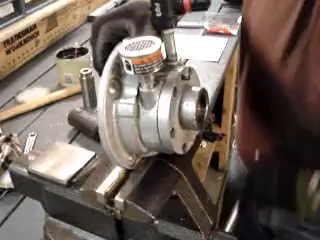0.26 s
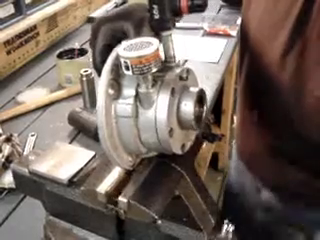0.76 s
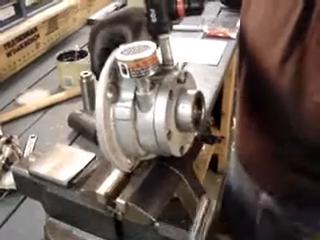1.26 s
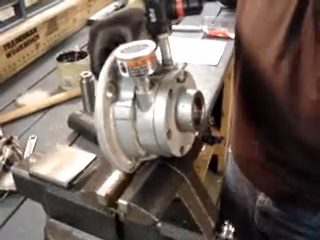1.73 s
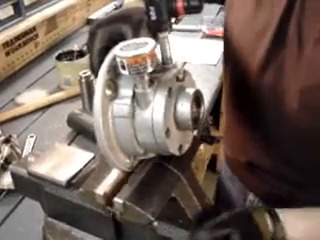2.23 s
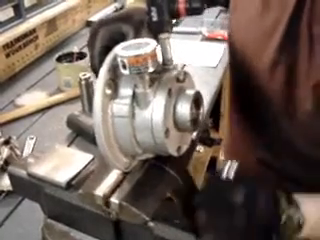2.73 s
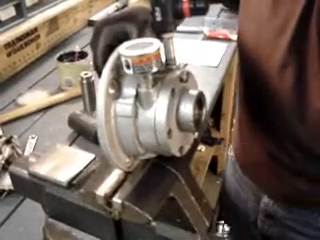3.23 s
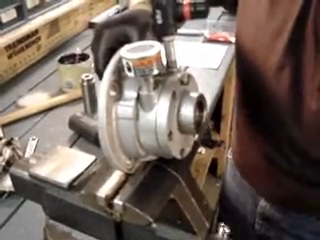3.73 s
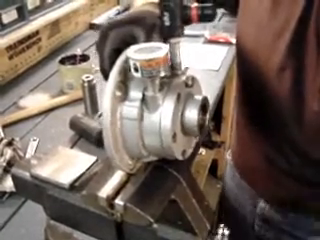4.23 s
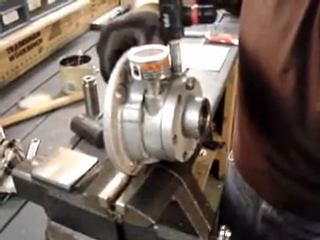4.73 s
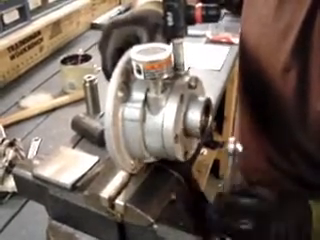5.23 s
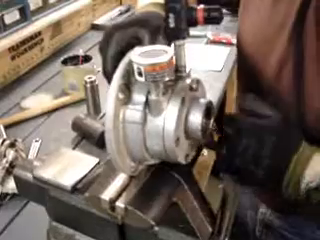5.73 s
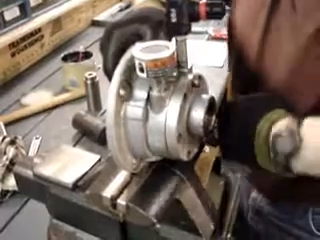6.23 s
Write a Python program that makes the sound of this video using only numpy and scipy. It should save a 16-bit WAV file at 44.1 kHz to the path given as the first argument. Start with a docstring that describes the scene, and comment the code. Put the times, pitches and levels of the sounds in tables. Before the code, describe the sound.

Close, loud metal clanks and bright tinks from a sliding vise handle give way to sparser knocks, clacks and a final faint squeak.

```python
"""A bench vise is wound shut on a metal housing, close to the microphone in a small workshop.
Its loose steel handle slides through the hub, tinkles, and hits the hub with heavy clanks.
The screw clacks and knocks in its play, grinds, and squeaks faintly as the jaws bite.
Struck steel is made of fading tones and noise; grinding and background are coloured noise.
The room adds a short tail, and the loudest blows overload the recorder."""
import sys
import numpy as np
from scipy import signal
from scipy.fft import rfft, irfft, next_fast_len
from scipy.io import wavfile

SR = 44100
rng = np.random.default_rng(int(sys.argv[2]) if len(sys.argv) > 2 else 0)


def store_wav(level_fs):
    """Save 16-bit WAV to argv[1]."""
    pcm = np.round(np.clip(np.atleast_2d(level_fs), -1, 1) * 32767)
    wavfile.write(sys.argv[1], SR, pcm.T.astype(np.int16))


N = 285238
AGE = np.arange(SR // 2) / SR  # seconds since a blow

# Event levels below are relative: each sound's function trims them further.
# The handle hits the hub: dropped on its end stop, the last one pulled by hand:
# [t/s, body level/dB, crack level/dB, bench thud level/dB, knob note f/Hz]
HANDLE_HITS = [(0.365, 3.5, -19, -28, 1380), (0.811, 3, -10, -20.5, 1463), (0.989, 0.5, -18, -23, 1296),
               (1.195, 5, -11, -29.5, 1420), (1.323, 2, -12.5, -25.5, 1490), (1.569, 6.5, -4, -23, 1357),
               (1.625, 5.5, -7, -28, 1478), (1.745, 5, -8.5, -31, 1394), (2.377, -1, -26, -16.5, 1330),
               (2.972, 0.5, -30, -28.5, 1380), (4.116, -2, -7.5, -42, 1386), (4.63, -4, -7, -34.5, 1246),
               (5.784, -17, -16, -26, 1350)]
# Hard steel-on-steel contacts at the hub: [t/s, edge level/dB, body level/dB, hub ring level/dB]
HUB_CONTACTS = [(0.2808, -8, -10.5, -25), (0.804, -2, -9.5, -9.5), (0.8949, -20, -11.5, -27),
                (1.1754, -15, -12.5, -22), (1.2674, -14, -10, -24), (1.6393, -15.5, -25, -18),
                (2.6438, -29, -11, -28.5), (2.809, -8, -13, -14), (2.8954, -12, -8.5, -9.5),
                (2.9496, 0.5, -8, -8.5), (3.0813, -20, -21, -32), (3.3823, -23.5, -30.5, -33),
                (3.494, -28, -18.5, -34), (3.5398, -21, -27.5, -42), (3.5808, -9.5, -22.5, -22),
                (3.6101, -27, -21, -35), (3.6416, -22, -17, -28), (3.7737, -30.5, -27.5, -38.5),
                (3.835, -39.5, -18, -48), (4.0075, -31.5, -47, -44), (4.114, -11.5, -11.5, -11),
                (4.1216, -11, -12, -15.5), (4.2988, -7.5, -14, -22), (4.3465, -13.5, -19, -29),
                (4.4251, -18, -21.5, -33), (4.5176, -14.5, -24.5, -25), (4.5758, -12, -28.5, -31),
                (4.6309, -5.5, -11.5, -7), (4.6371, -3.5, -18, -25), (4.769, -40, -14.5, -38),
                (4.783, -17.5, -18.5, -30.5), (4.8489, -35, -24, -32), (5.0145, -29, -33.5, -39),
                (5.7795, -15.5, -13.5, -15.5), (5.7881, -32, -19, -18)]
# Taps on the handle bar: [t/s, overtone level/dB, lowest note level/dB, t60/s]
# Here t60 is the vise body's fade; it also stretches or shortens the overtones.
BAR_TAPS = [(0.0153, -10.5, -16.5, 0.16), (0.0622, -20, -36, 0.099), (0.5224, -6.5, -20.5, 0.15),
            (0.7412, -6, -20.5, 0.14), (0.7577, -4, -26, 0.61), (0.7714, -11, -41, 0.36),
            (1.1325, -16.5, -48, 0.11), (1.4107, -14.5, -27, 0.095), (1.5368, -9, -39, 0.8),
            (1.5936, -14.5, -26, 0.2), (1.8375, -21, -35, 0.25), (1.9615, -19.5, -21, 0.33),
            (2.0684, -14.5, -50, 0.2), (2.1031, -17.5, -24.5, 0.19), (2.6945, -37, -29, 0.32),
            (2.714, -19.5, -31, 0.11), (2.7517, -7, -37, 0.11), (2.7894, -13.5, -31, 0.38),
            (2.835, -17.5, -20.5, 0.15)]
# The clearest dull knocks of the screw in its nut: [t/s, level/dB]
NUT_KNOCKS = [(0.331, -11), (0.379, -0.5), (0.973, -5.5), (1.298, -4.5), (1.384, -10.5), (1.674, -6),
              (1.914, -18), (2.051, -26), (2.245, -24), (2.341, -13.5), (2.363, -4), (2.442, -10.5),
              (2.459, -10.5), (2.547, -11.5), (2.875, -18), (3.163, -13), (3.24, -16.5), (4.083, -26),
              (4.234, -11.5), (4.275, -16.5), (4.599, -12), (4.693, -11), (4.852, -15.5), (5.566, -19.5),
              (5.604, -15), (6.44, -17)]
# The bar scrapes through the hub, for at least 5 ms: [start t/s, end t/s, rasp level/dB, singing level/dB]
BAR_SLIDES = [(0.537, 0.538, -18, -19), (0.754, 0.78, -27, -34), (1.42, 1.438, -32, -25.5),
              (1.532, 1.568, -18, -48), (2.761, 2.808, -23.5, -21.5)]
# Level between the blows: grinding, rattle and dying tails: [t/s, level/dB]
LEVEL_BETWEEN_BLOWS = [(0.0, -32.5), (0.49, -36), (0.77, -46), (0.92, -28), (1.21, -28), (1.46, -34.5),
                       (1.76, -21.5), (2.2, -43), (2.86, -27), (3.33, -40), (3.71, -34), (3.87, -41.5),
                       (4.14, -50), (4.27, -29), (4.7, -48), (5.08, -53), (5.85, -35), (6.47, -69)]
# Level of the background, as the recorder's gain drifts: [t/s, level/dB]
BACKGROUND_LEVEL = [(0, -40.5), (2.3, -48.5), (4.102, -47), (5.2, -43.5), (6.47, -42.5)]

# Clear notes of each part: [f/Hz, relative level/dB, t60/s before the stretch given to ring()]
# The sliding jaw
JAW_NOTES = [(634.6, 2, 0.28), (597, 5.5, 0.19), (677.7, -1, 0.25), (439.7, -3.5, 0.28)]
# The handle bar's overtones, same columns [f/Hz, level/dB, t60/s]
BAR_OVERTONES = [(4754, -9, 0.14), (5860, 4, 0.1), (6040, 8.5, 0.078), (6110, 7, 0.03), (6400, 0, 0.071),
                 (6650, -12.5, 0.051), (7500, -45, 0.039), (8700, -34, 0.13), (9800, -4.5, 0.19),
                 (9450, -9, 0.067), (11000, -24, 0.36)]
# The bar's lowest bending pair, same columns [f/Hz, level/dB, t60/s]
BAR_LOWEST = [(3063, -2.5, 0.13), (3010, -10.5, 0.12)]
# The hub, same columns [f/Hz, level/dB, t60/s]
HUB_NOTES = [(2987, -3, 0.13), (3350, 4, 0.085), (3527, 0, 0.062), (4110, 0, 0.085), (4696, -4, 0.097),
             (4900, -7, 0.082)]
# The collar, same columns [f/Hz, level/dB, t60/s]
COLLAR_NOTES = [(5750, 2, 0.025), (6100, 4, 0.046), (6910, 0, 0.04), (7240, -10, 0.13), (8200, -36, 0.029),
                (9350, -11, 0.065), (10900, -20.5, 0.074)]
# The vise's cast body, same columns [f/Hz, level/dB, t60/s]
CASTING_NOTES = [(650.6, -5, 0.15), (788, -12.5, 0.063), (1016, -2, 0.087), (1010, -12, 0.12),
                 (1186, 2.5, 0.084), (1251, -0.5, 0.096), (1582, -5, 0.09)]
# The screw's nut, same columns [f/Hz, level/dB, t60/s]
NUT_NOTES = [(1201, 0.5, 0.08), (1135, -3, 0.082), (1301, -5.5, 0.14), (759, -4.5, 0.18), (650.4, -1, 0.14)]
# The clamped metal housing, same columns [f/Hz, level/dB, t60/s]
HOUSING_NOTES = [(1470, 4, 0.14), (1860, -9, 0.28), (1903, -8, 0.23), (1960, -4.5, 0.17), (2342, -0.5, 0.1),
                 (2482, -3.5, 0.094), (2534, 7, 0.045)]

# Noise colours, scaled to a common loudness when used: [f/Hz, relative level/dB per Hz]
# The many close notes of the iron under a clank
IRON_COLOUR = [(100, -51), (300, -32), (520, -10.5), (640, -2.5), (820, -1), (1000, 3.5), (1450, -3.5),
               (1700, -6), (1920, -4.5), (2130, -18.5), (2400, -13), (3300, -16), (5000, -37), (12000, -28)]
# The vise body's hollow answer, same columns [f/Hz, level/dB]
BODY_COLOUR = [(100, -51), (300, -8), (520, -3.5), (660, 1.5), (850, -1), (1200, -6), (1380, -6),
               (1750, -12.5), (2600, -15), (5000, -27.5), (11000, -33), (13000, -37)]
# The sharp edge of steel on steel, same columns [f/Hz, level/dB]
EDGE_COLOUR = [(1200, -26), (2200, -10), (3200, 8), (3800, 1), (4400, 0), (5300, -0.5), (6200, 0),
               (7500, -6), (8800, -9.5), (10200, -8), (11500, -21), (13000, -22)]
# The bench's low thud, same columns [f/Hz, level/dB]
THUD_COLOUR = [(30, -46), (70, -15), (110, -14), (200, -4), (340, -1), (450, 6.5), (700, -43), (2000, -60)]
# The hub sleeve's close notes, same columns [f/Hz, level/dB]
SLEEVE_COLOUR = [(1500, -18), (2300, -16), (2950, 0.5), (3450, 1), (3800, -4.5), (4200, -21), (4800, 0),
                 (5600, -34), (8000, -19)]
# The grinding thread, same columns [f/Hz, level/dB]
THREAD_COLOUR = [(100, -16), (250, -2.5), (450, 2.5), (700, 1.5), (1300, -13), (1900, -7), (3000, -25),
                 (6000, -35), (11000, -29.5), (13000, -46)]
# The workshop background, same columns [f/Hz, level/dB]
BACKGROUND_COLOUR = [(15, -60), (25, -22), (150, -14.5), (246, -5), (383, -5), (484, -9), (524, -11),
                     (566, -13), (715, -10.5), (836, -16), (2430, -26), (3680, -30.5), (5030, -30.5),
                     (11000, -40.5), (12500, -44), (16200, -63), (22000, -120)]
# How long the room's tail takes to fade by 60 dB: [f/Hz, t60/s]
ROOM_FADE = [(120, 0.75), (400, 0.86), (1000, 0.37), (3000, 0.48), (6000, 0.38), (10000, 0.34)]

SQUEAK_START_S, SQUEAK_END_S = 5.89, 6.39  # the thread squeaks as the jaws bite
CLACK_T60_S, KNOCK_T60_S = 0.11, 0.15  # the time to fade by 60 dB
JAW_DB, JAW_LOSS_DB_PER_S = -15, 4.5  # relative to the clank; the slack jaw hums less as the vise closes
HOUSING_DB, HOUSING_LOSS_DB_PER_S = -19, 3  # relative to the clank; the jaws grip the housing more and more
TINK_BODY_DB = -10  # relative to the tap
NUT_DB, KNOCK_WASH_DB, KNOCK_THUD_DB = -18.5, -18, -28.5  # nut, body and bench, relative to the knock
GRIND_DB = -9  # relative to the level between the blows
# Small chance contacts, relative to the level between the blows, before each sound's own trims
RATTLE_KNOCK_DB, RATTLE_EDGE_DB, RATTLE_BODY_DB, RATTLE_HUB_DB = 12.5, 6, 2.5, -5
RATTLE_SCATTER_DB = 1.5
TOP_HZ = 12350  # the recorder's band limit


def amp(db):
    """Turn decibels into gain."""
    return 10 ** (np.asarray(db) / 20)


def unit(x):
    """Scale to an average (rms) strength of 1."""
    return x / np.sqrt(np.mean(x ** 2) + 1e-20)


def along(points, hz):
    """Read (f/Hz, value) points on a log pitch axis."""
    f, v = np.transpose(points)
    return np.interp(np.log(hz + 1), np.log(f + 1), v)


def wobble(rate, size):
    """Draw a random curve of straight lines between `rate` points a second."""
    knots = rng.standard_normal(int(size * rate / SR) + 3)
    return np.interp(np.arange(size) * rate / SR, np.arange(len(knots)), knots)


def noise(colour, size, ripple_db=0, spacing_hz=170):
    """Make coloured noise of rms 1, with optional chance peaks along its spectrum."""
    m = next_fast_len(size)
    hz = np.fft.rfftfreq(m, 1 / SR)
    peaks = np.interp(hz / spacing_hz, np.arange(256), rng.standard_normal(256))
    ripple = peaks * hz / (hz + 1500)  # weaker in the bass
    gain = amp(along(colour, hz) + ripple_db * ripple)
    return unit(irfft(rfft(rng.standard_normal(m)) * gain, m)[:size])


def add(track, s, sound):
    """Mix a sound into the track at time s."""
    part = track[max(round(s * SR), 0):][:len(sound)]
    part += sound[:len(part)]


def blow(x):
    """Scale a struck sound to rms 1 over its first 20 ms."""
    return x / np.sqrt(np.mean(x[:SR // 50] ** 2) + 1e-20)


def fade(t, t60, hold):
    """A contact buzzes at full strength for hold seconds, then dies away by 60 dB in t60 seconds."""
    return amp(-60 * np.maximum(t - hold, 0) / np.maximum(t60, .01))


def wash(colour, t60, rise, hold=0):
    """Countless close notes, made as noise, swell and die together; each blow favours other ones."""
    notes = noise(colour, len(AGE), ripple_db=4.5)
    swell = 1 - np.exp(-AGE / rise)
    return blow(notes * fade(AGE, t60, hold) * swell)


def ring(notes, stretch, scatter_db, detune, rise=0.0017, waver=0.5, hold=0):
    """Clear notes, struck at a new spot each time; grip sets their life and loose contact makes them waver."""
    hz, db, t60 = np.transpose(notes)[:, :, None]
    level, shift, phase = rng.standard_normal((3, len(notes), 1))
    t = AGE[:SR // 3]
    drift = np.array([wobble(128.8, len(t)) for _ in notes])
    tones = np.sin(2 * np.pi * (hz * (1 + detune * shift) * t + phase) + waver * drift)
    sound = np.sum(amp(db + scatter_db * level) * fade(t, t60 * stretch, hold) * tones, axis=0)
    swell = 1 - np.exp(-t / rise)
    return blow(np.pad(sound * swell, (0, len(AGE) - len(t))))


def background():
    """Steady background noise, heard louder or softer as the recorder's gain drifts."""
    level_db = np.interp(np.arange(N) / SR, *np.transpose(BACKGROUND_LEVEL))
    return amp(level_db) * noise(BACKGROUND_COLOUR, N)


def between_blows(s):
    """Read the level between the blows, in dB, at time s."""
    return np.interp(s, *np.transpose(LEVEL_BETWEEN_BLOWS))


def screw():
    """The turning thread grinds unevenly inside the casting: noise with a jittery level."""
    level_db = between_blows(np.arange(N) / SR) + GRIND_DB + 6.4 * wobble(45, N)
    return amp(level_db) * noise(THREAD_COLOUR, N)


def casting(t60):
    """The vise body answers any light contact with a hollow knock."""
    notes = ring(CASTING_NOTES, t60 / 0.13, scatter_db=1, detune=0.0217, rise=0.0054, waver=0.76)
    return 0.58 * notes + 0.47 * wash(BODY_COLOUR, t60, rise=0.0039)


def tinks():
    """The free bar rattles against the hub and rings in its bending notes until it is damped."""
    out = np.zeros(N)
    for s, ring_db, note_db, t60 in BAR_TAPS:
        overtones = ring(BAR_OVERTONES, t60 / 0.24, scatter_db=3.0, detune=0.003,
                         rise=0.0014, waver=0.81, hold=0.0071)
        edge = wash(EDGE_COLOUR, t60=0.098, rise=0.00024, hold=0.0033)
        tap = amp(-15.0) * overtones + amp(-16.5) * edge + amp(TINK_BODY_DB) * casting(t60)
        lowest = ring(BAR_LOWEST, t60 / .25, scatter_db=1, detune=.002, rise=.0013, waver=.25)
        add(out, s, amp(ring_db) * tap + amp(note_db - 5.5) * lowest)
    return out


def rattle(count):
    """Loose parts touch at chance moments, following the level between the blows: rows [t/s, level/dB]."""
    s = (np.arange(count) + rng.random(count)) / count * N / SR
    return np.transpose([s, between_blows(s) + RATTLE_SCATTER_DB * rng.standard_normal(count)])


def knocks():
    """Greased contacts start softly and have little edge; they shake the nut, the body and the bench."""
    out, t60 = np.zeros(N), KNOCK_T60_S
    small = [(s, db + RATTLE_KNOCK_DB) for s, db in rattle(count=55)]
    for s, db in list(NUT_KNOCKS) + small:
        nut = ring(NUT_NOTES, t60 / 0.13, scatter_db=3, detune=0.022, rise=0.0031, waver=0.99, hold=0.0025)
        body = wash(BODY_COLOUR, t60, rise=0.0013)
        bench = wash(THUD_COLOUR, t60=0.25, rise=0.0021)
        knock = amp(NUT_DB) * nut + amp(KNOCK_WASH_DB) * body + amp(KNOCK_THUD_DB) * bench
        add(out, s, amp(db) * knock)
    return out


def clacks():
    """Tight steel contacts buzz: a bright snap from the collar, a rough ring from the hub and sleeve."""
    out, t60 = np.zeros(N), CLACK_T60_S
    small = [(s, db + RATTLE_EDGE_DB, db + RATTLE_BODY_DB, db + RATTLE_HUB_DB)
             for s, db in rattle(count=36)]
    for s, edge_db, body_db, hub_db in list(HUB_CONTACTS) + small:
        collar = ring(COLLAR_NOTES, t60 / 0.52, scatter_db=9.5, detune=0.0105,
                      rise=0.0014, waver=1.0, hold=0.013)
        edge = wash(EDGE_COLOUR, t60 * 0.38, rise=0.00064, hold=0.0036)
        snap = amp(-18.5) * edge + amp(-21.0) * collar
        hub_notes = ring(HUB_NOTES, t60 / 0.13, scatter_db=5, detune=0.012, rise=0.001, waver=1.3)
        hub = 0.72 * hub_notes + 0.32 * wash(SLEEVE_COLOUR, t60 * .8, rise=0.001)
        add(out, s, amp(edge_db) * snap + amp(hub_db - 7) * hub + amp(body_db - 5) * casting(t60))
    return out


def clanks():
    """The handle hits the hub: a crack and a short loud note, which jaws, housing and bench take up."""
    out = np.zeros(N)
    for s, body_db, crack_db, thud_db, note_hz in HANDLE_HITS:
        jaw_db = body_db + JAW_DB - JAW_LOSS_DB_PER_S * s
        housing_db = body_db + HOUSING_DB - HOUSING_LOSS_DB_PER_S * s
        knob = ring([(note_hz, 0, .035)], stretch=0.78, scatter_db=.5, detune=0.00194,
                    rise=0.00051, waver=0.42, hold=0.0015)
        jaw = ring(JAW_NOTES, stretch=1, scatter_db=2, detune=.025, rise=.004, waver=1.1)
        housing = ring(HOUSING_NOTES, stretch=1, scatter_db=3, detune=0.0045, rise=0.0037, waver=1.0)
        add(out, s, amp(body_db - 14.5) * knob + amp(jaw_db) * jaw + amp(housing_db) * housing)
        add(out, s, amp(body_db - 18.5) * wash(IRON_COLOUR, t60=0.1853, rise=0.00057))
        add(out, s, amp(crack_db - 17.5) * wash(EDGE_COLOUR, t60=0.033, rise=0.0003))
        add(out, s, amp(thud_db - 5.5) * wash(THUD_COLOUR, t60=0.36, rise=0.0005))
    return out


def slides(slips_per_s=900):
    """A sliding bar chatters: a fast run of tiny slips rasps in the hub and keeps the bar singing."""
    out = np.zeros(N)
    for start, end, rasp_db, singing_db in BAR_SLIDES:
        chance, force = rng.random(len(AGE)), rng.standard_normal(len(AGE))
        size = max(round((end - start) * SR), SR // 200)
        slips = (force * (chance < slips_per_s / SR))[:size]
        rasp = wash(EDGE_COLOUR, t60=0.013, rise=0.00012)
        singing = ring(BAR_OVERTONES + BAR_LOWEST, stretch=.25, scatter_db=2, detune=.005)
        for db, steel in (rasp_db, rasp), (singing_db, singing):
            scrape = signal.fftconvolve(slips, steel)  # every slip strikes the steel anew
            # same total energy as a sound of rms 1 lasting as long as the slips
            level = np.sqrt(len(slips) / (np.sum(scrape ** 2) + 1e-9))
            add(out, start, amp(db) * scrape * level)
    return out


def squeak(slips_per_s=27, start_hz=4800, db=-53):
    """Under load the thread sticks and slips in tiny, high, rising chirps."""
    out, t = np.zeros(N), AGE[:SR // 70]
    times = np.arange(SQUEAK_START_S, SQUEAK_END_S, 1 / slips_per_s)
    for s, (late, shift, level) in zip(times, rng.standard_normal((64, 3))):
        chirp = np.sin(2 * np.pi * start_hz * (1 + .012 * shift) * (t + .8 * t * t))
        add(out, s + .003 * late, amp(db + 2 * level) * np.hanning(len(t)) * chirp)
    return out


def workshop(x):
    """The room's tail is fading noise, 8 ms late; its treble dies before its bass."""
    hz, t, z = signal.stft(rng.standard_normal(SR), SR, nperseg=256)
    fading = amp(-60 * t / along(ROOM_FADE, hz)[:, None])
    tail = signal.istft(z * fading, SR, nperseg=256)[1]
    tail = np.pad(tail, (round(.008 * SR), 0))
    return signal.fftconvolve(x, tail / np.linalg.norm(tail))[:N]


def scene():
    """Mix the vise, its room and the background; the thin bar sends little into the room."""
    heavy, hub, bar = clanks() + knocks(), clacks(), tinks() + slides()
    room = workshop(amp(-14.0) * heavy + amp(-18) * hub + amp(-24) * bar)
    return (heavy + hub + bar + room + screw() + squeak() + background())[None]


def record(dry):
    """The recorder flattens the highest peaks and rolls off steeply at its band limit."""
    clipped = dry / (1 + np.abs(dry) ** 8) ** (1 / 8)
    m = next_fast_len(N + SR // 2)
    roll_off = 1 + (np.fft.rfftfreq(m, 1 / SR) / TOP_HZ) ** 60
    return irfft(rfft(clipped, m) / roll_off, m)[:, :N]


dry = scene()
out = record(dry)
store_wav(out)
```